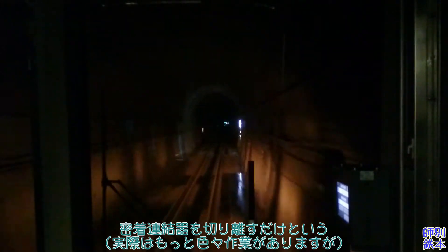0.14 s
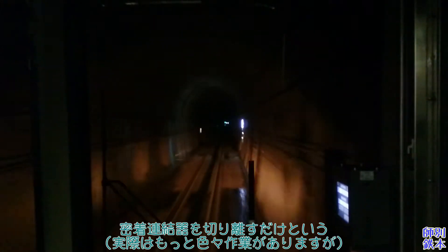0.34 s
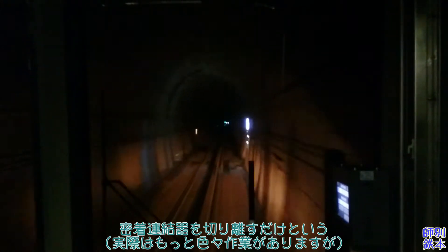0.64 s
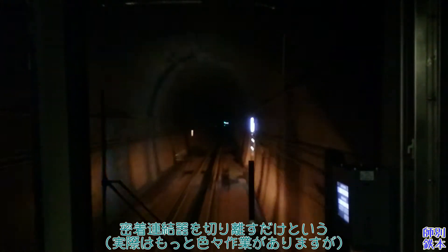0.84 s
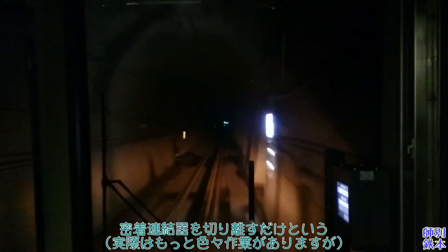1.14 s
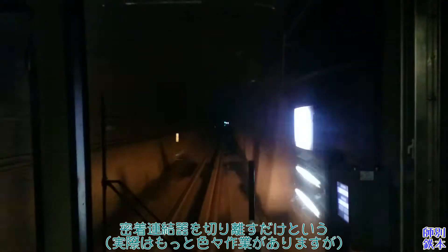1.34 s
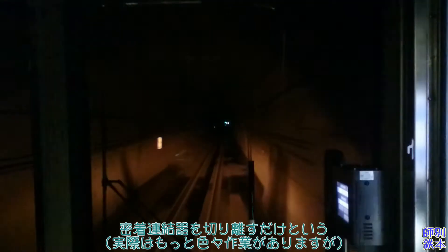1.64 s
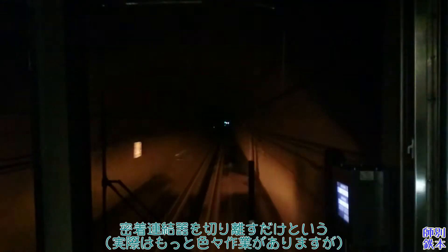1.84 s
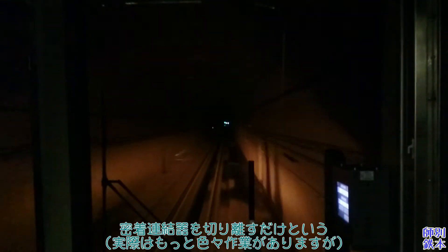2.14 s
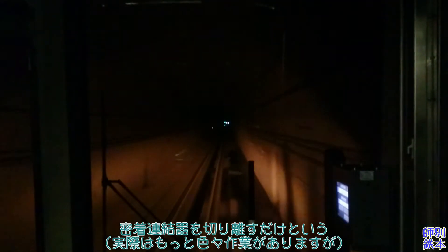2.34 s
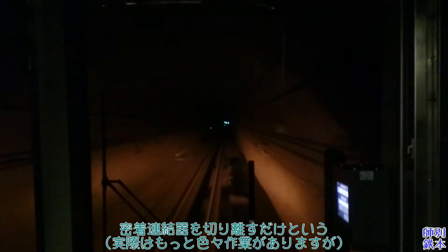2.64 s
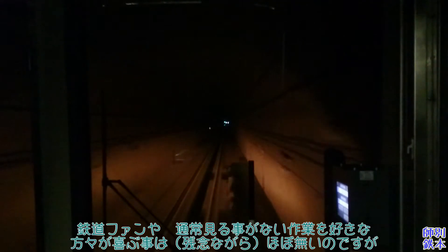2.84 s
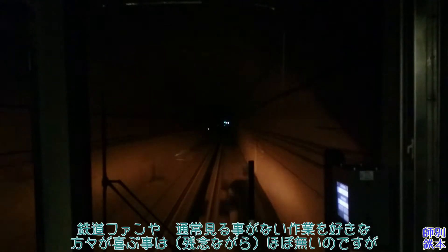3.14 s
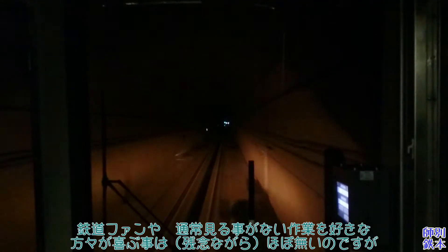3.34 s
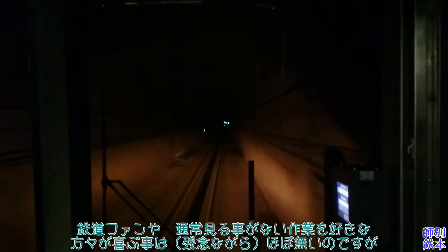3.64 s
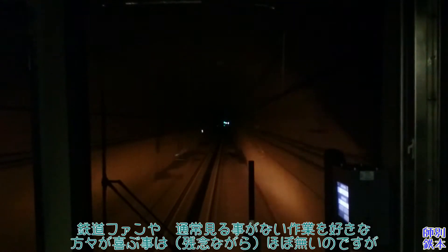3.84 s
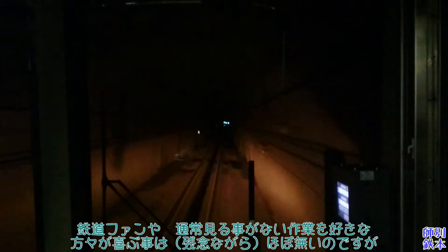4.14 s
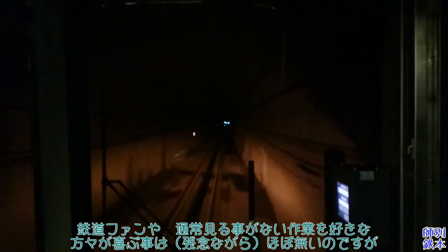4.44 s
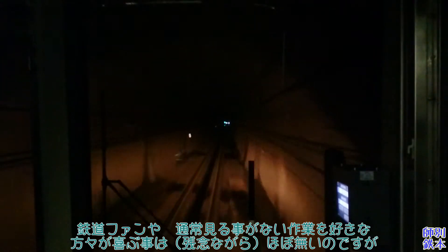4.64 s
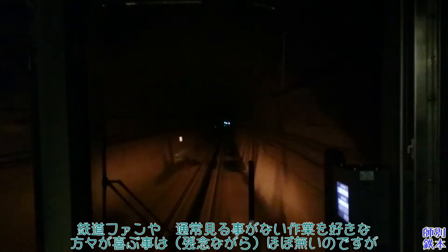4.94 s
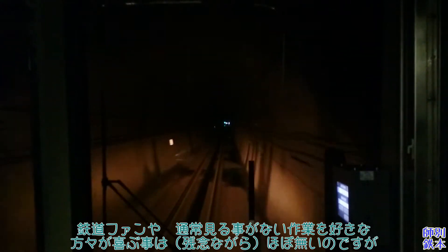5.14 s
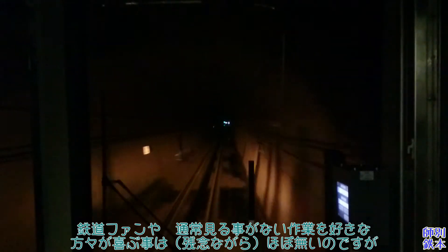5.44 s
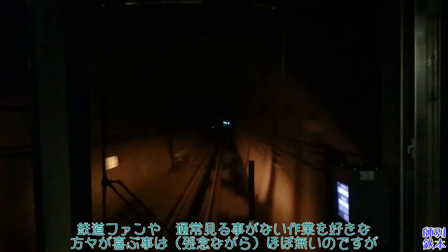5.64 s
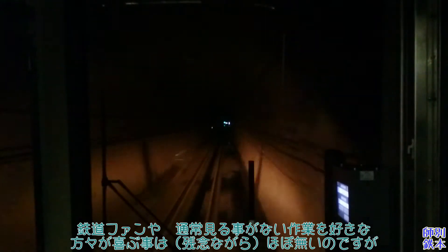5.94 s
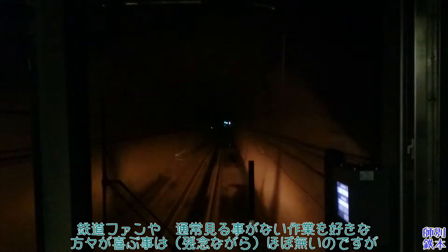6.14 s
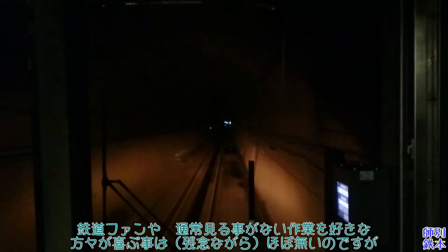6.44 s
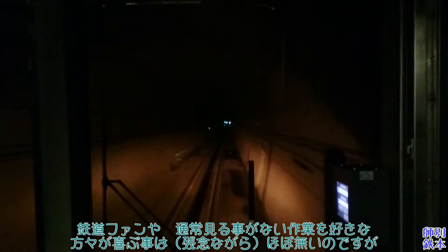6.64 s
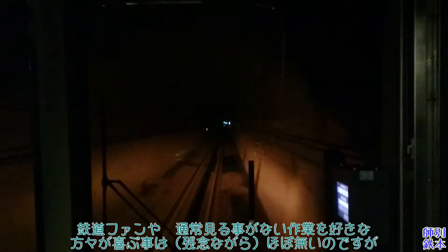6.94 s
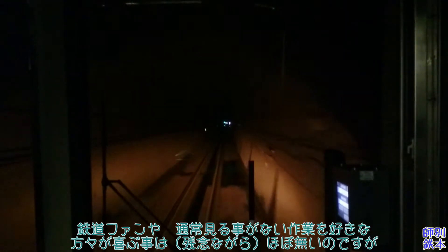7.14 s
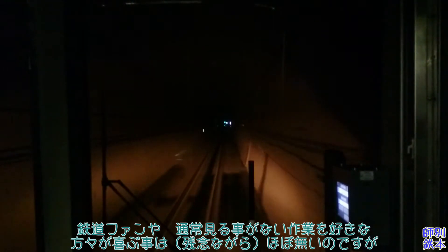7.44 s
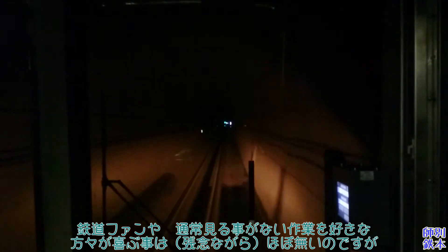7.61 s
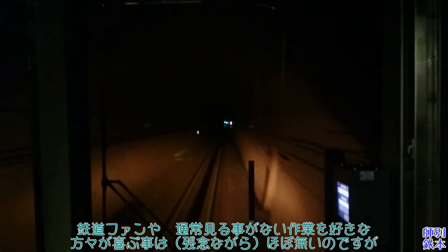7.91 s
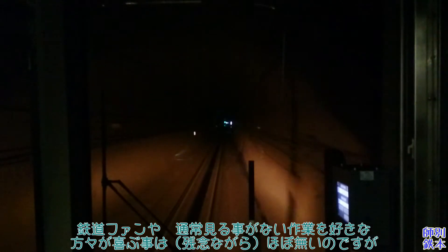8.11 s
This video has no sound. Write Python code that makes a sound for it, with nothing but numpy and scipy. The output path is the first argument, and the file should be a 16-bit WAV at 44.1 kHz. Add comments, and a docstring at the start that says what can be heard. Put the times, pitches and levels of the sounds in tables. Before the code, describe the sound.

A train cab interior in a dark tunnel, bass-heavy and enclosed. Floor and body resonate in an uneven, throbbing rumble with soft thumps from the track, strongest in the first second and a half. Deeper lurches come and go, notably around the middle and near the end. Wheel roar flickers in broad muffled noise, steel sings faintly, and a thin high motor whistle hides underneath. The stereo image leans right, with little bright treble.

```python
"""In a tunnel, an electric train runs, heard from the front of the car.
Rail roughness shakes the car body: noise rings its low modes, which boom, and jolts knock it with short impulses.
The rolling roar, coloured noise in flickering bands, comes back from the tunnel wall and swells as the lining
changes. Rails and wheels hum in narrow resonances and a motor whines faintly in two wavering sines.
Most of the sound is louder at the right microphone."""
import sys
import numpy as np
from scipy import signal
from scipy.fft import rfft, irfft, next_fast_len
from scipy.io import wavfile
from scipy.ndimage import uniform_filter1d, map_coordinates

SR = 44100
rng = np.random.default_rng(int(sys.argv[2]) if len(sys.argv) > 2 else 0)


def materialize(psi):
    """Save the field psi as 16-bit PCM at rate SR to the path in sys.argv[1].

    A 1-D psi becomes a single channel; in a 2-D psi each row is a channel.
    """
    bounded = np.clip(np.atleast_2d(psi).T, -1, 1)
    quanta = np.round(bounded * 32767).astype(np.int16)
    wavfile.write(sys.argv[1], SR, quanta)


def nominal_scale(level):
    """Amplitude ratio for a level in decibels (scalar or array-like)."""
    x = np.asarray(level, float) / 20
    return 10 ** x


N = 364707
HZ = np.fft.rfftfreq(N, 1 / SR) + 1e-3   # FFT bins, kept off zero for the logarithms

# rolling roar as the wall and the rail surface change: (t/s, level/dB)
ROAR_LEVEL = [(0, -40), (.09, -35), (.42, -38), (.7, -43), (.78, -41), (1.15, -34.5), (1.54, -41.5),
              (1.64, -38), (1.72, -36), (1.82, -33), (1.93, -40), (2.05, -38), (2.1, -38), (2.55, -39),
              (2.76, -37.5), (3.25, -39.5), (3.36, -36), (3.47, -35.5), (3.57, -43.5), (3.8, -40),
              (4.38, -38.5), (4.51, -35.5), (4.93, -42), (5.04, -37.5), (5.16, -40.5), (5.67, -38),
              (5.72, -41.5), (6.01, -36.5), (6.22, -37.5), (6.56, -38.5), (6.86, -37.5), (6.98, -41.5),
              (7.14, -36.5), (7.62, -38), (7.69, -40), (7.92, -38.5), (8.27, -35.5)]
# jolts from the track: (t/s, boom swell level/dB, floor swell level/dB, held/s)
TRACK_JOLTS = [(0.077, -21, -37.5, 0.032), (0.169, -17, -31, 0.015), (0.395, -16.5, -30.5, 0.0099),
               (0.47, -18, -36.5, 0.01), (0.571, -14.5, -22.5, 0.0085), (1.198, -18.5, -33, 0.01),
               (1.277, -13.5, -31, 0.013), (1.375, -18.5, -41.5, 0.066), (1.45, -20.5, -35.5, 0.026),
               (1.822, -17.5, -29, 0.073), (1.96, -23, -35, 0.022), (2.085, -22, -37, 0.12),
               (2.307, -18.5, -31, 0.018), (2.383, -18, -32, 0.021), (2.776, -22.5, -30, 0.088),
               (2.96, -16, -34.5, 0.017), (3.071, -15.5, -31, 0.012), (3.33, -31.5, -28.5, .03),
               (3.43, -17.5, -35, 0.13), (3.701, -24, -35, 0.036), (3.80, -20.5, -35, 0.04),
               (4.069, -21.5, -25, 0.01), (4.16, -18, -35, 0.013), (4.214, -20, -32, 0.013),
               (4.332, -17, -28, 0.012), (4.41, -26, -24.5, 0.016), (4.51, -21.5, -28.5, 0.025),
               (4.614, -17.5, -36.5, 0.034), (4.839, -17.5, -40.5, 0.035), (5.068, -19, -33.5, 0.02),
               (5.18, -20, -37.5, 0.022), (5.469, -18, -28.5, 0.035), (5.65, -18, -33, 0.038),
               (5.83, -23, -33, 0.04), (6.03, -22, -36, 0.076), (6.169, -22, -30, 0.023),
               (6.437, -18, -32.5, 0.015), (6.569, -18, -32, 0.018), (6.622, -20, -31.5, 0.043),
               (6.848, -17.5, -37, 0.037), (7.161, -18, -29, 0.032), (7.382, -18, -30.5, 0.035),
               (7.75, -29, -31.5, 0.016), (7.921, -21.5, -28.5, 0.054), (8.14, -26.5, -34.5, 0.031)]
# booming resonances of the car body: (f/Hz, width/Hz, level/dB)
BODY_MODES = [(106.53, 7.17, 1), (125.2, 9, -8.5), (92, 5.4, -9.5)]
# resonances of the floor panels: (f/Hz, width/Hz, level/dB)
PANEL_MODES = [(146.3, 20.6, 0.5), (167.4, 30, -5.5), (203.5, 29, -6.5), (240.6, 18.8, -6),
               (283.3, 19, -12), (312.8, 7.4, -14.5)]


def in_time(rows):
    """Columns of a curve at every sample."""
    s, *columns = np.transpose(rows)
    t = np.arange(N) / SR
    return [np.interp(t, s, column) for column in columns]


def over_hz(points, column=1):
    """A column of a spectrum table at every FFT bin, interpolated over log frequency."""
    points = np.array(points)
    return np.interp(np.log(HZ), np.log(points[:, 0]), points[:, column])


def resonances(modes):
    """Resonant peaks add in power; the result is an amplitude per bin."""
    power = 0
    for hz, width, db in modes:
        detuning = (HZ - hz ** 2 / HZ) / width
        power = power + nominal_scale(2 * db) / (1 + detuning ** 2) ** 2
    return np.sqrt(power)


def drift(rate):
    """Slow chance of spread about 1: a smooth curve through rate random knots per second."""
    knots = rng.standard_normal(int(N / SR * rate) + 3)
    return map_coordinates(knots, [np.arange(N) * rate / SR], order=3)


def pair(source=None):
    """Spectra at left and right, of white noise or a source: alike in the bass, nearly unrelated in the treble."""
    # left against right microphone: (f/Hz, level/dB)
    left_tilt = [(25, -10), (65, -7.5), (130, -7), (190, -4.5), (240, -8.5), (430, -7), (610, -1.5),
                 (720, -4.5), (1500, -3), (1800, -5.5), (3400, -4), (4600, 0), (6000, -7), (8000, -1),
                 (11500, 5), (13000, -1), (15300, -16)]
    # kinship of the microphones: (f/Hz, likeness/0-1, left leads by/rad)
    likeness = [(25, .95, .9), (60, .98, .6), (105, .997, .4), (150, .96, .75), (200, .88, .2),
                (300, .74, -.6), (430, .36, 0.), (520, .4, .1), (650, .66, .1), (740, .45, -.9),
                (820, .1, -2.), (950, .2, -3.), (1500, .25, -2.5), (2300, .2, -.7), (3000, .05, 0.)]
    if source is None:
        first, second = rfft(rng.standard_normal((2, N)))
    else:
        first, second = source, 0
    alike = over_hz(likeness)
    lead = np.exp(1j * over_hz(likeness, column=2))
    left = (alike * first + np.sqrt(1 - alike ** 2) * second) * lead
    tilt = nominal_scale(over_hz(left_tilt) / 2)   # half the difference on each side
    return np.array([left * tilt, first / tilt])


def level(x, db):
    """The mean of both channels is scaled to unit rms, then follows the level curve."""
    mono = np.mean(x, axis=0)
    return x * nominal_scale(db) / np.sqrt(np.mean(mono ** 2))


def swells(calm_db, s, db, held_s, rise_s, fall_s):
    """Level in dB: each event rises, holds and dies away over a calm level; powers add."""
    coarse = np.arange(0, N, 64)
    t = coarse / SR - s[:, None]
    rise = np.clip(t / rise_s + .5, 0, 1) ** 2   # centred on the event
    fall = np.exp(-np.maximum(t - held_s[:, None], 0) / fall_s)
    power = nominal_scale(2 * db)[:, None] * rise * fall
    events = np.interp(np.arange(N), coarse, power.sum(axis=0))
    return 10 * np.log10(nominal_scale(2 * calm_db) + events)


def shaken(modes, db, steady, smooth_s):
    """Noise rings the modes; part of its own swell is evened out so that the state of the track sets the level."""
    deep_cut = np.sqrt(1 + (32 / HZ) ** 8)   # the microphones lose the deepest bass
    x = irfft(pair() * resonances(modes) / deep_cut, N)
    swell = np.abs(signal.hilbert(x[1], next_fast_len(N))[:N])
    swell = uniform_filter1d(swell, max(int(smooth_s * SR), 1))
    return level(x / (swell + 0.56 * swell.mean()) ** steady, db)


def body():
    """Body and floor panels shake evenly and swell at each jolt, the boom dipping just before it."""
    s, boom_db, floor_db, held_s = np.transpose(TRACK_JOLTS)
    lull_db, lull_s = -3, .02   # depth; lead over the jolt
    marks = np.zeros(N)
    marks[((s - lull_s) * SR).astype(int)] = lull_db
    lull = signal.fftconvolve(marks, np.hanning(int(2 * lull_s * SR) + 3), "same")

    rise_s = .015
    calm_boom = -24.5 + np.linspace(0, 0.5, N)   # between jolts, in dB: gains half a decibel
    boom = lull + swells(calm_boom, s, boom_db, held_s, rise_s, fall_s=0.014)

    roar_db, = in_time(ROAR_LEVEL)
    follows = 0.27   # share of the roar's swing
    calm_floor = -35 + follows * (roar_db - roar_db.mean())
    floor = swells(calm_floor, s, floor_db, held_s, rise_s, fall_s=0.018)
    return shaken(BODY_MODES, boom, 0.92, 0.046) + shaken(PANEL_MODES, floor, 0.38, 0.055)


def jolts():
    """Each jolt is an impulse that sets the body and floor modes ringing, softened by a band-pass."""
    s, boom_db, floor_db, _ = np.transpose(TRACK_JOLTS)
    boom_knock_db, floor_knock_db = -10, -6   # impulse strength against the swell level
    ringing = np.zeros(N)
    for modes, strength_db in ((BODY_MODES, boom_db + boom_knock_db),
                               (PANEL_MODES, floor_db + floor_knock_db)):
        pushes = np.zeros(N)
        pushes[(s * SR).astype(int)] = nominal_scale(strength_db)
        for hz, width, mode_db in modes:
            r = np.exp(-np.pi * 1.2 * width / SR)   # decay per sample
            w = 2 * np.pi * hz / SR
            ring = signal.lfilter([0, np.sin(w)], [1, -2 * r * np.cos(w), r * r], pushes + 1e-18)
            ringing += nominal_scale(mode_db) * ring
    band = signal.butter(2, [50, 400], "band", fs=SR, output="sos")
    soft = signal.sosfilt(band, ringing)
    return irfft(pair(rfft(soft)), N)


def sway():
    """The deepest modes: a sway that lurches set going, and an even drone."""
    # resonances of the swaying car: (f/Hz, width/Hz, level/dB)
    sway_modes = [(56, 23, -3), (67, 12, 7.5)]
    # lurches that set the sway going: (t/s, level/dB, held/s)
    lurches = [(.1, -28.5, .12), (.62, -32.5, .05), (.89, -31, 0.3), (1.3, -34.5, .1), (1.62, -33, .07),
               (1.81, -30, .05), (2.1, -35, 0.073), (2.3, -33.5, 0.034), (2.55, -34, .45),
               (3.07, -25.5, 0.074), (3.37, -25.5, 0.061), (3.7, -29, 0.09), (4.2, -28, .07),
               (4.5, -22, 0.066), (4.82, -34, 0.04), (5.02, -26, 0.028), (6.3, -32.5, 0.37),
               (6.42, -33, 0.039), (7.08, -33.5, 0.16), (7.62, -24.5, 0.07), (7.82, -25.5, 0.056),
               (8.1, -26, .1)]
    s, db, held_s = np.transpose(lurches)
    lurching = swells(-37, s, db, held_s, rise_s=0.028, fall_s=0.017)
    drone = shaken([(37, 20, 0)], -43.5, .3, .1)   # one mode: Hz, width in Hz, dB
    return shaken(sway_modes, lurching, 1.0, 0.12) + drone


def roar():
    """Wheel and rail noise off the wall, in bands that flicker partly together."""
    # spectrum of the roar: (f/Hz, level/dB per Hz)
    roar_colour = [(180, -22.5), (300, 0), (346, -5.5), (390, -5), (586, -9.5), (923, -2.5), (1520, -16.5),
                   (1850, -12), (2200, -17), (3180, -23.5), (3890, -29.5), (4810, -30), (5710, -23),
                   (8000, -48.5), (10300, -56.5), (11500, -53), (13000, -58), (15500, -57)]
    # air rush against the roar, before its weight per band: (t/s, level/dB)
    air_rush = [(0, 1.5), (.45, 2), (.9, 0), (1.6, 0.5), (2.6, -0.5), (3.5, 0), (4.6, 0.5), (5.3, -1),
                (6.4, .6), (7.2, 0), (8.27, 0.3)]
    steadies = 0.24      # share of the roar's swing that the rush evens out, before the same weight
    top_swings = .4      # the faint top above 7 kHz gains this share of the swing
    flicker_db, own_flicker_db = .6, 0.4   # all bands together; each band alone
    roar_db, = in_time(ROAR_LEVEL)
    rush_db, = in_time(air_rush)
    swing = roar_db - roar_db.mean()
    noise = pair() * nominal_scale(over_hz(roar_colour))
    centres = np.geomspace(232, 21000, 14)   # Hz
    spacing = np.log(centres[1] / centres[0])
    together, bands = drift(7.6), 0
    for hz in centres:
        distance = np.clip(np.log(HZ / hz) / spacing, -1, 1)
        window = np.cos(np.pi / 2 * distance) ** 2
        treble = np.clip(np.log(hz / 2500) / 1.3, 0, 1.3)   # weight, zero below 2.5 kHz
        band_db = treble * (rush_db - steadies * swing)
        band_db += (hz > 7000) * top_swings * swing
        flicker = flicker_db * together + own_flicker_db * drift(6)
        bands = bands + irfft(noise * window, N) * nominal_scale(band_db + flicker)
    return level(bands, roar_db)


def singing():
    """Rail and wheels ring in narrow resonances that come and go with the worn stretches."""
    # resonances of the rail: (f/Hz, width/Hz, level/dB)
    rail_modes = [(860, 16, -3), (904, 12, 2), (952, 16, -1), (920, 140, -6)]
    # resonances of the wheels: (f/Hz, width/Hz, level/dB)
    wheel_modes = [(1807, 18, 2), (1860, 140, -3), (2292, 20, -11)]
    # worn stretches where the steel sings: (t/s, rail level/dB, wheel level/dB, held/s)
    worn = [(.07, -40, -43.5, .3), (.47, -47, -52, .12), (.75, -41.5, -51.5, 0.063), (.86, -43, -50, 0.26),
            (1.76, -47, -51, 0.06), (2.089, -45, -58.5, 0.031), (2.24, -56, -50.5, 0.038),
            (2.68, -55.5, -54.5, 0.22), (3.33, -45.5, -55.5, 0.12), (4.0, -51.5, -55, 0.33),
            (4.461, -51.5, -45, 0.1), (4.659, -51.5, -49, .25), (5.0, -54, -49.5, .15),
            (5.35, -46.5, -48, 0.067), (5.6, -54, -51.5, 0.08), (5.95, -45, -49, 0.15),
            (6.45, -44, -46.5, 0.13), (6.74, -40.5, -49.5, 0.12), (7.131, -39, -51, 0.049),
            (7.3, -44.5, -49.5, .2), (7.85, -48, -53, 0.052), (8.12, -47, -56, .15)]
    s, rail_db, wheel_db, held_s = np.transpose(worn)
    smooth_rail_db, smooth_wheel_db = -55, -57.5   # calm level on smooth rail
    rise_s, fall_s = .04, 0.06
    rail_db = swells(smooth_rail_db, s, rail_db, held_s, rise_s, fall_s)
    wheel_db = swells(smooth_wheel_db, s, wheel_db, held_s, rise_s, fall_s)
    rail = shaken(rail_modes, rail_db + 1.2 * drift(9.2), .2, 0.029)
    wheels = shaken(wheel_modes, wheel_db + 1.4 * drift(14), 0.25, 0.022)
    return rail + wheels


def tone(hz, db, waver_hz, left_db):
    """A slightly wavering sine whose phase wanders apart between the microphones."""
    phase = 2 * np.pi * np.cumsum(hz + waver_hz * drift(25)) / SR
    sides = nominal_scale(np.array([[left_db / 2], [-left_db / 2]]))
    both = np.sin([phase + 0.84 * drift(3), phase]) * sides
    return np.sqrt(2) * both * nominal_scale(db + 2.9 * drift(11))   # the root makes db an rms level


def whine():
    """A thin motor whistle and its octave sink in pitch as the train slows."""
    # motor whistle: (t/s, level/dB, octave level/dB)
    whistle = [(0, -72, -71), (1, -73.5, -81), (2, -65.5, -75), (3, -64.5, -78), (4, -65.5, -71.5),
               (5, -67.5, -76.5), (6, -71, -68), (7, -72, -73), (8.27, -69.5, -72.5)]
    db, octave_db = in_time(whistle)
    hz = np.linspace(3131, 3099, N)
    low = tone(hz, db, waver_hz=1.5, left_db=5.)
    octave = tone(2 * hz, octave_db, waver_hz=3., left_db=-9.)
    return low + octave


def scene():
    """Body, jolts, sway, roar, ringing and whine together."""
    return body() + jolts() + sway() + roar() + singing() + whine()


def roll_off(x):
    """The treble ends steeply here."""
    return signal.sosfilt(signal.butter(12, 16280, fs=SR, output="sos"), x)


def record(dry):
    """A steep low-pass takes off the top, 60 dB down from 15.9 kHz."""
    low_pass = signal.cheby2(16, 60, 15900, fs=SR, output="sos")
    mix = signal.sosfilt(low_pass, dry)
    return roll_off(mix)


dry = scene()
out = record(dry)
materialize(out)
```